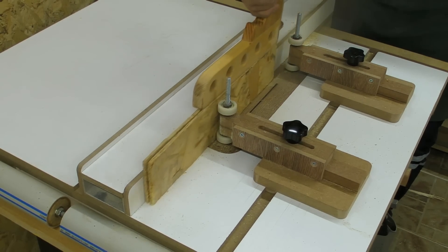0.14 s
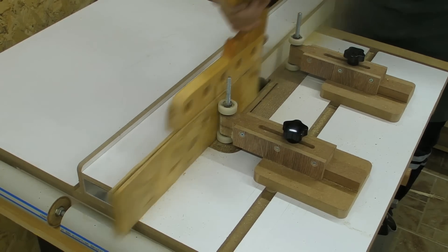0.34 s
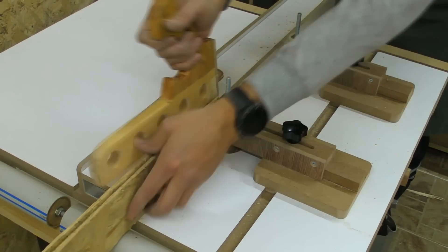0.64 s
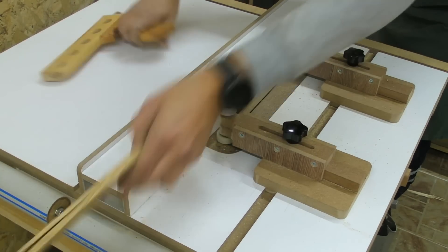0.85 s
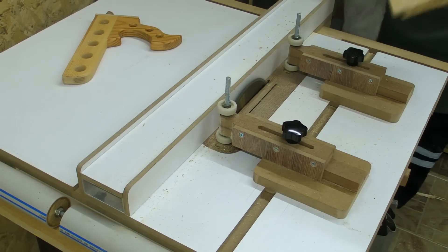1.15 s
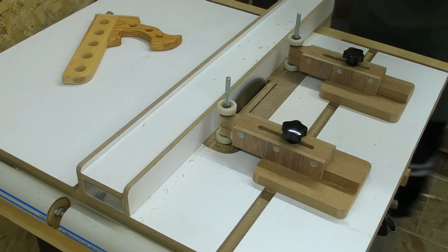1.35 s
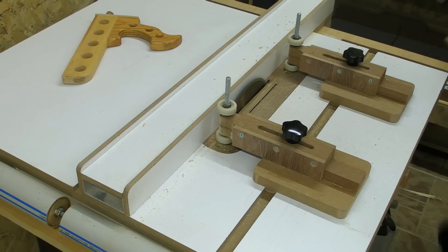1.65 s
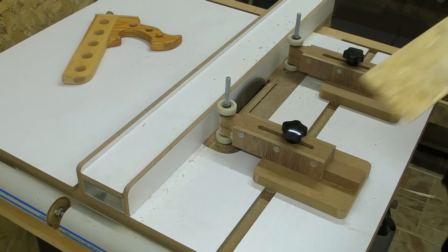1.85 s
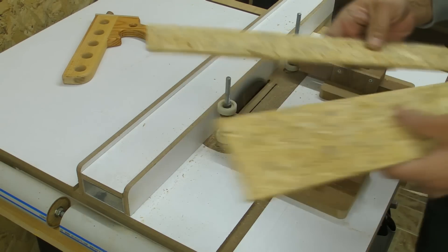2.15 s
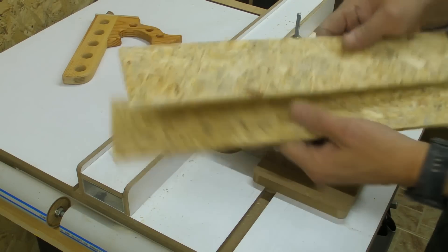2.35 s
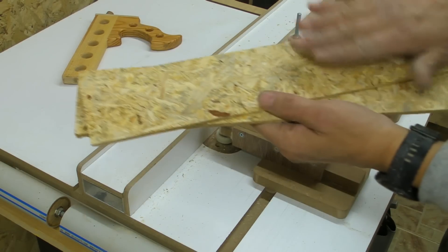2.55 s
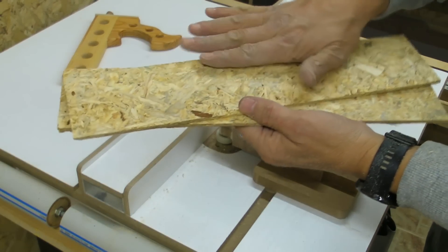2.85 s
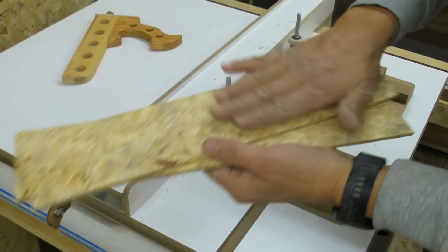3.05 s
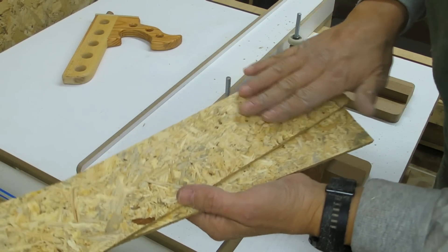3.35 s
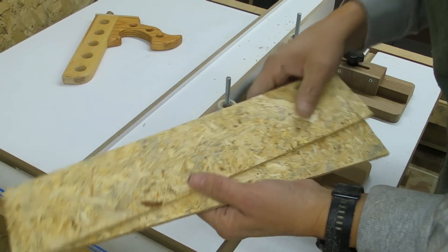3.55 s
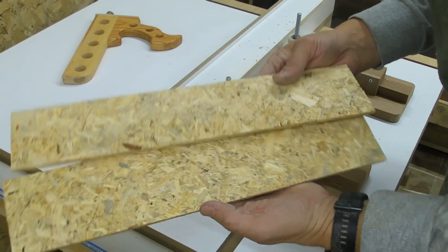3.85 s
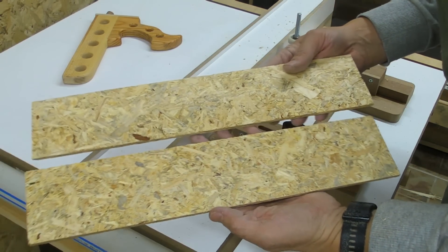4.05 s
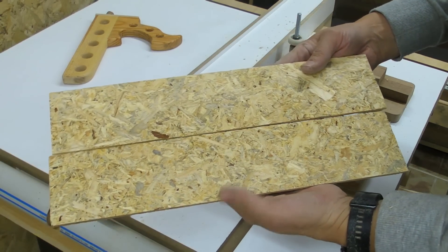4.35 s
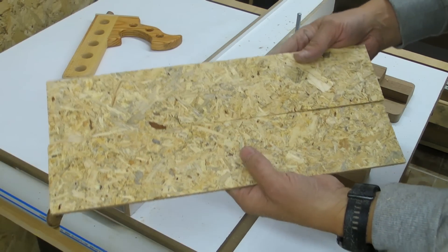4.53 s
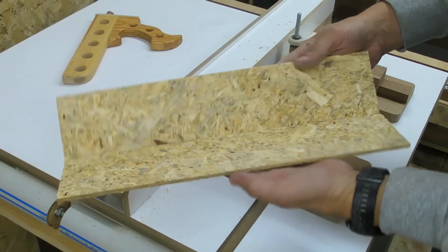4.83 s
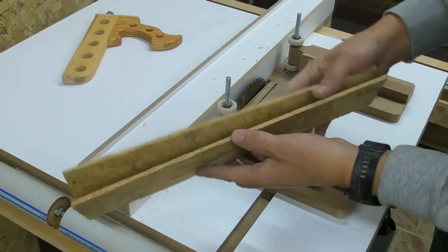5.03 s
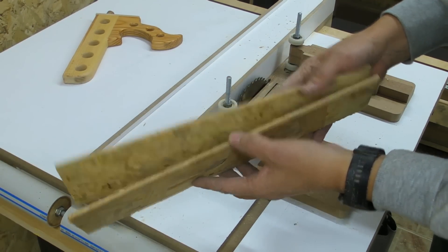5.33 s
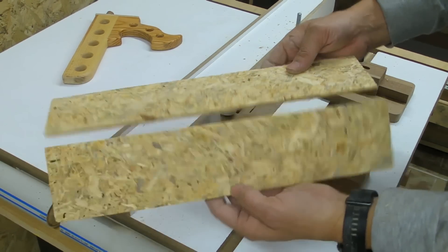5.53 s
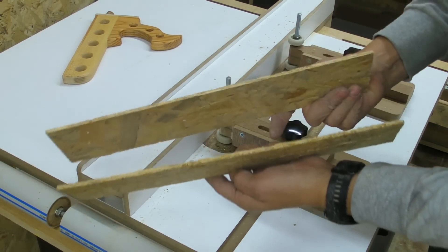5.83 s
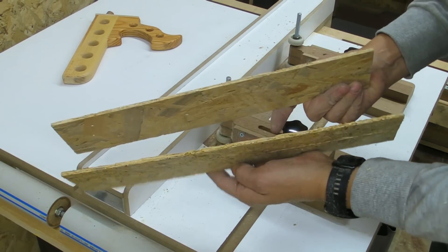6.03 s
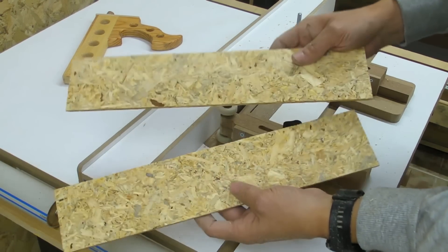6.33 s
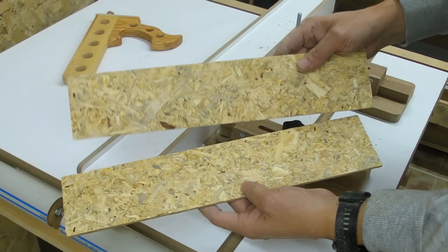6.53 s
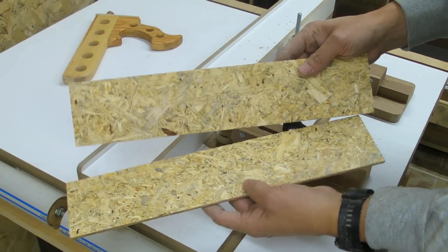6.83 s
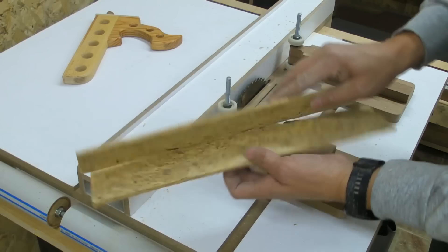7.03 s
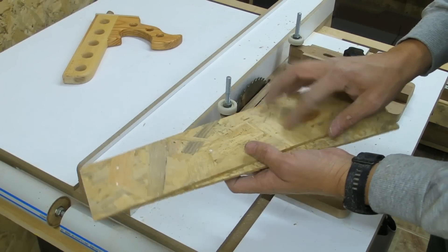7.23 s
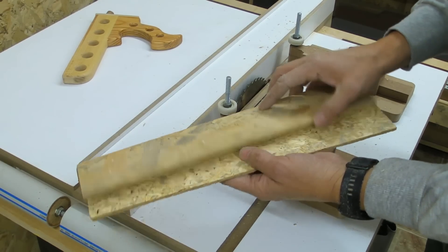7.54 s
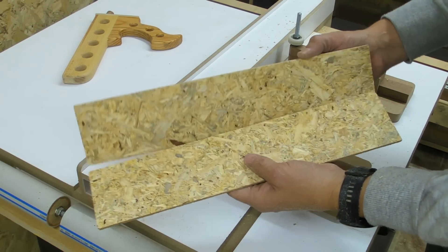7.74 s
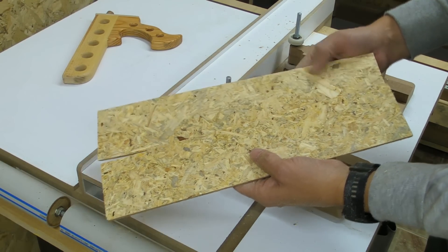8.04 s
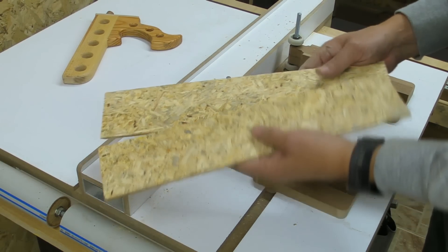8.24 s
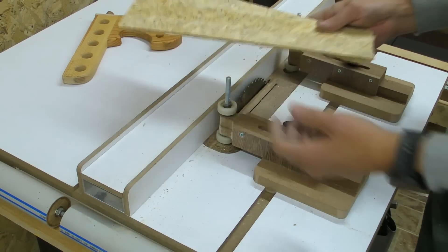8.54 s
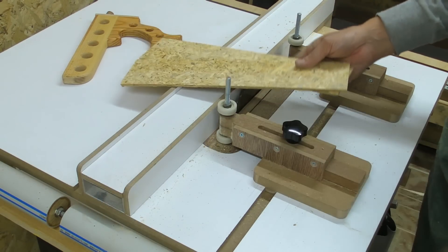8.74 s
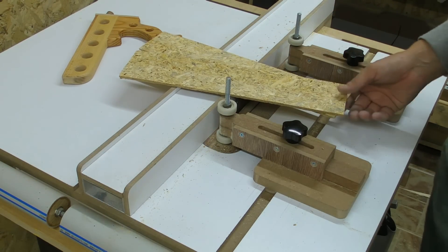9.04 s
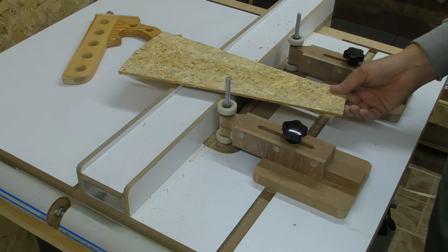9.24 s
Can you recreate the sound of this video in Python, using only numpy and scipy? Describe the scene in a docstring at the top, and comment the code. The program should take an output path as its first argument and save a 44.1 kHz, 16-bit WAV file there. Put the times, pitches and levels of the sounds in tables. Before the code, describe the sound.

A table saw finishes a loud cut, runs free, then whines down to a stop before chipboard strips are rubbed and knocked together.

```python
"""A table saw finishes a cut, runs free, is switched off and coasts to a stop; its motor, blade, fan and gear
tones are locked to one shaft speed, so the whine slides down through the cabinet resonances.
Before it has stopped, two strips of chipboard begin to be rubbed (grainy hiss), then knocked together and
laid down (short bursts that ring the board). A small workshop hums below: steady tones over faint noise."""
import sys
import numpy as np
from scipy import signal
from scipy.fft import rfft, irfft
from scipy.io import wavfile

SR = 44100
rng = np.random.default_rng(int(sys.argv[2]) if len(sys.argv) > 2 else 0)


def put_to_file(sound):
    """Save the sound as 16-bit audio at rate SR, in the file named by the first command-line argument."""
    columns = np.atleast_2d(sound).T  # one column per channel
    safe = np.clip(columns, -1, 1)
    whole_steps = np.round(safe * 32767)
    wavfile.write(sys.argv[1], SR, whole_steps.astype(np.int16))


N = 413658
TIME = np.arange(N) / SR   # s
FREQS = np.maximum(np.arange(N // 2 + 1) * SR / N, 1)   # Hz

# the blade breaks through; the power is cut
CUT_END_S, SWITCH_OFF_S = 0.547, 1.217

# Cabinet and blade resonances. Each row: frequency in Hz, width in Hz, boost in dB.
CABINET_MODES = [(179.7, 26, 12), (249.5, 9.4, 17), (292.5, 10, 11.5), (368, 24, 7.5), (402.4, 24, 13),
                 (481.7, 13.2, 13.5), (639.4, 17, 9.5), (763, 18, 8.5), (925, 33.4, 10),
                 (958.7, 19.5, 15.5), (1092, 19, 10), (1230, 28, 5), (1554, 18, 7.5), (1731, 26, 11.5),
                 (1886, 30, 7.5), (2010, 110, 4), (2808, 190, 8.5), (3380, 87, 6.5), (5550, 170, 5)]
# Chipboard resonances. Each row: frequency in Hz, width in Hz, boost in dB.
BOARD_MODES = [(227, 28, 5.5), (410, 19, 17), (680, 46, 7), (820, 50, 0.5), (942, 130, 9), (1217, 95, 5.5),
               (1527, 200, 4), (1900, 120, 5.5), (3160, 150, 5.5), (3870, 140, 3.5), (5880, 680, 7.5)]
# Spectrum of wood flakes rubbing. Each row: frequency in Hz, relative level in dB.
RUB_SPECTRUM = [(300, -11.5), (600, -4), (1000, -7.5), (1350, 1.5), (2300, -0.5), (3300, -1), (4800, -3),
                (6000, -6.5), (7300, -9), (9500, -5), (12000, -7), (15500, -3.5)]
# Stereo width. Each row: frequency in Hz, side less mid level in dB.
STEREO_WIDTH = [(60, -1), (110, -21.5), (200, -11), (380, -19.5), (700, -13.5), (1290, -13.5), (2380, -10),
                (4400, -6.5), (8120, -3.5), (15000, -1)]


def shaft_speed():
    """Rotation under load: turns per second, wandering with the uneven feed while the blade is in the wood."""
    # Held down by the cut, racing up once free, then coasting. Each row: time in seconds, turns per second.
    speed_curve = [(0, 91), (.36, 93), (.55, 92), (.68, 96.7), (.78, 99.6), (.92, 100.8), (1.2, 101.7),
                   (1.3, 95), (1.4, 84.5), (1.55, 73), (1.75, 63), (2.0, 55), (2.25, 47.6), (2.5, 40.6),
                   (3.0, 29), (3.5, 18.7), (4.0, 9.2), (4.52, 0)]
    in_wood = 1 - after(CUT_END_S, 0.057)
    return np.interp(TIME, *np.transpose(speed_curve)) + 0.3985 * drift(9) * in_wood


def cutting(turns):
    """Chip fracture: tearing teeth make bright noise, and a ragged buzz that dies shortly before breakthrough."""
    # Each row: frequency in Hz, relative level in dB.
    tearing_spectrum = [(50, -21), (150, -11.5), (280, -26), (420, -4.5), (600, -4.5), (900, -10),
                        (1300, -0.5), (2300, -5.5), (3500, 1), (6000, 2.5), (7300, -2.5), (10500, 2),
                        (15500, -2)]
    # Tones under load. Each row: multiple of the shaft speed, relative level in dB.
    load_orders = [(5, -54.5), (10, -53), (15, -48), (30, -40.5), (45, -52.5), (60, -41), (90, -42.5),
                   (105, -38.5), (120, -38), (135, -42.5), (150, -41.5), (165, -45.5)]
    tearing = comb(resonate(noise(tearing_spectrum), CABINET_MODES), depth_db=2.8, spacing_hz=91.1)
    chips = from_db(-35 + drift(400) + 0.5 * drift(6.2)) * tearing
    buzz = from_db(-9.5) * tones(turns, load_orders, flutter_db=3.5, smear=2.2, rate=39.4)
    buzz = buzz * (1 - after(0.36, 0.022))
    return (chips + buzz) * (1 - after(CUT_END_S, 0.032))


def running_free(speed, turns):
    """Rotating machinery without load: broadband air rush, and tones at multiples of the shaft speed."""
    free, powered = after(CUT_END_S, 0.03), 1 - after(SWITCH_OFF_S, 0.011)
    whistle_on = after(0.666, 0.014) * (1 - after(1.225, 0.028))
    # whistle_on gates the thin whistle. Each row: multiple of the shaft speed, level in dB.
    whistle_orders = [(39, -55), (40, -44.5), (41, -61.5), (42, -52), (80, -54), (120, -58), (152, -60)]
    whistle = whistle_on * tones(turns, whistle_orders, flutter_db=2.5, smear=0.36, rate=63)
    return (free * air_rush() + whistle + resonate(free * powered * drone(turns), CABINET_MODES)
            + blade_ring() + unbalance(speed, turns))


def air_rush():
    """Turbulence: rushing air is broadband noise that dies away after the switch-off."""
    # Each row: frequency in Hz, relative level in dB.
    air_spectrum = [(30, -21), (70, -0.5), (140, -5), (250, -8), (380, 7), (550, 1.5), (800, 2),
                    (1300, 2.5), (2200, -3), (4200, -2.5), (6000, -2.5), (7300, -10.5), (9500, -8.5),
                    (15500, -14.5)]
    dying = 1 - after(1.34, 0.11)   # half gone at 1.34 s
    return from_db(-35) * dying * comb(noise(air_spectrum), depth_db=2.1, spacing_hz=70)


def drone(turns):
    """Periodic forces: motor and blade sound at multiples of their own speeds, with brief swells."""
    # Motor tones. Each row: multiple of the shaft speed, relative level in dB.
    motor_orders = [(2, -28), (3, -27.5), (4, -16.5), (8, -36)]
    # Blade tones. Each row: multiple of the blade speed, relative level in dB.
    blade_orders = [(5, -9), (6, -21), (7, -24.5), (9, -16.5), (10, -18), (11, -17.5), (12, -28),
                    (15, -13.5)]
    # Swells. Each row: time of the peak in seconds, half length in seconds, added gain in dB.
    drone_swells = [(0.615, 0.16, -44), (0.97, 0.0087, -39), (1.153, 0.033, -40.5)]
    blade_ratio = 1.014   # blade turns per shaft turn
    gain = from_db(-43.5) + sum(from_db(db) * bump(s, half) for s, half, db in drone_swells)
    motor = tones(turns, motor_orders, flutter_db=2, smear=0.18, rate=12)
    blade = tones(blade_ratio * turns, blade_orders, flutter_db=5.0, smear=0.54, rate=12.94)
    return gain * (motor + blade)


def blade_ring():
    """Modal excitation: the blade sings briefly, grazed by the board's last corner, shaken, scuffed as it stops."""
    # Each row: frequency in Hz, width in Hz, time of the peak and half length in seconds, level in dB.
    blade_modes = [(3120, 17, 0.514, .05, -45), (4000, 15, 0.55, 0.054, -44.5),
                   (5360, 12.6, 0.507, 0.06, -48), (8700, 87, .5, 0.019, -42),
                   (4960, 13.6, .56, 0.028, -36), (4700, 130, 0.584, 0.057, -40),
                   (4360, 38, 0.518, 0.052, -43.5), (5360, 94, 2.45, .1, -44),
                   (5900, 300, 4.455, .025, -69), (12100, 450, 4.455, 0.024, -60)]
    return sum(from_db(db + 1.2 * drift(56.2)) * bump(s, half) * ringing(hz, width)
               for hz, width, s, half, db in blade_modes)


def unbalance(speed, turns):
    """Centrifugal force: an off-centre mass hums once a turn, and fades quickly as the shaft slows."""
    free_speed = 101.3   # turns per s
    db_per_speed = 3     # loss for each turn per s below the free speed
    gain = from_db(-35 - db_per_speed * (free_speed - speed) + drift(13.0))
    return gain * (1 - after(1.32, 0.27)) * np.sqrt(2) * np.sin(2 * np.pi * turns)


def coasting(speed, turns):
    """Forced resonance: the falling whine of the slack drive swells on each cabinet resonance it crosses."""
    throb = from_db(2 * np.sin(2 * np.pi * turns))   # once a turn
    noisy = after(1.248, 0.11) * grind(speed, turns)
    tonal = after(SWITCH_OFF_S, 0.019) * (gear_whine(speed, turns, throb) + fan_tone(speed, turns))
    return rattle_ring(speed, throb) + resonate(noisy + tonal, CABINET_MODES)


def grind(speed, turns):
    """Impact noise: the slack drive rattles, each band fading below its own speed, so it dulls as it slows."""
    # Each row: frequency in Hz, relative level in dB.
    coast_spectrum = [(60, -18.5), (130, -5.5), (260, -15), (420, 2.5), (600, 0.5), (850, -2), (1300, 4.5),
                      (2000, -2), (2300, -6), (3300, -6), (5900, -11.5), (6700, -22.5), (7900, -20.5),
                      (8600, -9.5), (10200, -8), (11300, -22), (12200, -15), (13200, -10), (15500, -19.5)]
    # Rows are rumble, clatter, rattle, sizzle and top hiss.
    # Each row: level in dB, knee in turns per second, loss per halving of speed in dB.
    band_laws = [(-46.5, 17.4, 5.5), (-48, 14.2, 9.5), (-40.5, 36, 8), (-39.5, 81.5, 10.5), (-48, 48, 4.5)]
    low, rest = split(shifting_noise(coast_spectrum, depth_db=4.0, spacing_hz=69.8, rate=9), 2320)
    rumble, clatter = split(low, 1375)
    rattle, rest = split(rest, 7700)
    sizzle, top = split(rest, 10000)
    bands = (rumble, clatter, rattle, sizzle, top)
    total = sum(band * with_speed(speed, *law) * from_db(1.06 * drift(12))
                for band, law in zip(bands, band_laws))
    # a slight swing once a turn, and by chance
    return total * from_db(-0.17 * np.sin(2 * np.pi * turns) + 0.43 * drift(130))


def gear_whine(speed, turns, throb):
    """Gear meshing: teeth bounce while fast, then settle into mesh and whine until the drive stalls."""
    # Tones of the drive gear. Each row: multiple of the shaft speed, relative level in dB.
    gear_orders = [(34, -7), (35, -5), (36, -9), (38, -11), (39, -4), (40, 2), (41, -1.5), (42, -5),
                   (45, -10)]
    # Louder speeds. Each row: turns per second, width in octaves, boost in dB.
    gear_swells = [(52, 0.24, 6), (33.84, 0.56, 8.5), (24.24, 0.021, 9), (21, 0.045, 6.5), (10.2, 0.24, 3)]
    mesh_speed, stall_speed = 49, 9.88   # turns per s
    mesh = tones(turns, gear_orders, flutter_db=3.4, smear=1.3, rate=32)
    bounce = tones(turns, gear_orders, flutter_db=5, smear=1.5, rate=28)
    meshed = 0.5 + 0.5 * np.tanh((mesh_speed - speed) / 2)
    whine = from_db(-57.5) * swelling(speed, gear_swells, stall_speed) * throb * mesh * meshed
    # the bounce is loudest near 67 turns per s, over 0.49 octaves, by 4.3 dB
    chatter = from_db(-61.5) * swelling(speed, [(67, 0.49, 4.3)], mesh_speed) * bounce
    return whine + chatter


def fan_tone(speed, turns):
    """Blade passing: the motor fan sounds at multiples of the shaft speed and dies below its stall speed."""
    # Each row: multiple of the shaft speed, relative level in dB.
    fan_orders = [(2, -14.5), (3, -21), (4, -34), (5, 0), (6, -11)]
    # Louder speeds. Each row: turns per second, width in octaves, boost in dB.
    fan_swells = [(102.7, 0.098, 14.5), (58.3, 0.21, 5), (36, .25, -1)]
    gain = from_db(-55) * swelling(speed, fan_swells, stall=32.3)
    return gain * tones(turns, fan_orders, flutter_db=1.0, smear=0.65, rate=22)


def rattle_ring(speed, throb):
    """Sustained modal excitation: the rattle keeps the steel blade ringing, building up as the drive goes slack."""
    # Each row: frequency in Hz, width in Hz, level in dB, knee in turns per second,
    # loss per halving of speed in dB.
    steel_modes = [(954, 39, -47, 8.9, 4), (2830, 130, -59, 23, 12), (5400, 370, -55, 15, 7.5)]
    modes = sum(with_speed(speed, *law) * ringing(hz, width) for hz, width, *law in steel_modes)
    return after(1.5, 0.47) * throb * modes


def with_speed(speed, db, knee, db_per_halving):
    """Power law with a knee: a gain level above the knee speed, falling steadily below it."""
    return from_db(db - db_per_halving * np.log2(1 + (knee / (speed + 1e-6)) ** 4) / 4)


def swelling(speed, swells, stall):
    """Resonance in speed: the gain of a tone that swells around certain speeds and dies below its stall speed."""
    octave = np.log2(speed + 1e-6)
    boost = sum(db * np.exp(-((octave - np.log2(at)) / width) ** 2) for at, width, db in swells)
    return from_db(boost) * (0.5 + 0.5 * np.tanh((octave - np.log2(stall)) / 0.035))


def rubbing():
    """Stick-slip friction: rough flakes catch on skin and each other, a grainy hiss coloured by the board."""
    # Hands and boards rub. Each row: start and length in seconds, relative hiss level in dB,
    # scrape less hiss in dB before the two are mixed.
    rub_strokes = [(3.30, 0.25, -44, 5), (4.435, 0.022, -54.5, -6), (4.65, .015, -64, -8),
                   (4.73, 0.17, -62.5, -3), (4.905, 0.017, -55.5, 1), (4.985, 0.021, -52, 1),
                   (5.03, 0.027, -57.5, -3), (5.37, 0.31, -52, -3.5), (6.108, 0.011, -47, 0.5),
                   (6.14, 0.077, -60, -6), (6.23, 0.077, -54, -3), (6.288, 0.011, -47.5, 1),
                   (6.365, 0.038, -53, 3), (6.85, 0.086, -60, -3.5), (7.052, 0.015, -53, -3),
                   (7.09, 0.031, -54, -2), (7.18, 0.025, -51.5, -0.5), (7.25, 0.16, -59.5, 1),
                   (7.35, 0.028, -59.5, 4.5), (7.475, 0.044, -55, -9), (7.545, 0.059, -54, -1.5),
                   (7.695, 0.024, -57.5, -3), (7.74, 0.031, -70, -4), (7.875, 0.011, -57.5, -1),
                   (7.99, 0.085, -56, -0.5), (8.11, 0.018, -57.5, 1), (8.195, 0.18, -56.5, -1),
                   (8.496, 0.013, -56, -3), (8.78, 0.14, -59.5, 0.5), (9.195, 0.016, -61.5, -9)]
    # Fingers shift on the boards between strokes. Each row: as for the strokes.
    finger_grips = [(4.5, 0.65, -64.5, -1.5), (6.9, 0.98, -63.5, 0), (8.5, 1, -70, 1)]
    hiss_gain = scrape_gain = 0
    for rows, unsteady in ((rub_strokes, from_db(drift(30))), (finger_grips, from_db(2.5 * drift(17)))):
        for start, length, db, scrape_db in rows:
            gain = from_db(db) * stroke(start, length) * unsteady
            hiss_gain = np.maximum(hiss_gain, gain)
            scrape_gain = np.maximum(scrape_gain, gain * from_db(scrape_db))
    grain = from_db(1.8 * drift(900) + drift(70))
    # the colour shifts as the contact wanders over the board
    surface = shifting_noise(RUB_SPECTRUM, depth_db=3.4, spacing_hz=290, rate=9)
    low, high = split(resonate(surface * grain + snags(), BOARD_MODES), 3130)
    # the fingers' changing grip lets the board's body sound more or less
    scrape = from_db(-8.5) * scrape_gain * low * from_db(0.46 * drift(27))
    return scrape + from_db(-3.0) * hiss_gain * high


def stroke(start, length):
    """Growth and decay: a rub swells, holds and lets go, leaving a short wash in the room."""
    attack = 0.016 + 0.16 * length   # s: a least part plus a share of the length
    rise = after(start + attack / 2, attack / 2)
    since_end = np.clip(TIME - start - length, 0, 1)
    release = np.exp(-since_end / 0.021)   # s to fall to 1/e
    wash = from_db(-5) * np.exp(-since_end / 0.065)
    return rise * np.maximum(release, wash)


def snags():
    """Random impulses: sparse ticks of uneven size, from single flakes that catch and let go."""
    per_second, least_db, spread_db = 90, 11, 1   # sizes before colouring
    born = rng.random(N) < per_second / SR
    size_db = least_db + spread_db * np.minimum(rng.exponential(1, N), 3)
    ticks = born * from_db(size_db) * rng.choice([-1, 1], N)
    return irfft(rfft(ticks) * from_db(at_hz(RUB_SPECTRUM)), N)


def knocks():
    """Impact: each contact is a crack and a short burst that ring the board, with a wash from the room."""
    # Boards knocking; edge taps have little bass. Each row: time in seconds, relative level in dB,
    # lowest frequency in Hz, contact brightness in Hz.
    contacts = [(5.005, -32.5, 450, 1710), (6.12, -45, 1300, 5000), (6.296, -37.5, 1200, 4970),
                (6.385, -42, 1400, 2600), (6.398, -44, 1400, 3000), (7.062, -33, 200, 1300),
                (7.0972, -23, 352, 1700), (7.103, -29, 500, 1700), (7.109, -32, 350, 1500),
                (7.121, -30.5, 400, 2000), (7.13, -38, 500, 1600), (7.226, -36, 150, 500),
                (7.703, -43, 3000, 11970), (7.762, -37, 250, 1200), (8.021, -38, 3000, 12000),
                (8.505, -46, 2000, 7030), (8.704, -33.5, 900, 2600), (8.715, -26, 794, 2600),
                (8.724, -34.5, 400, 1200), (8.747, -33, 350, 900), (8.809, -30, 700, 1500),
                (8.829, -32, 200, 604), (8.948, -29.5, 150, 505)]
    # Each row: frequency in Hz, relative level in dB.
    knock_spectrum = [(120, -4), (220, -4), (450, -7.5), (700, -6.5), (1100, -9.5), (1700, -12),
                      (2500, -17), (5000, -19), (15000, -23.5)]
    bounce_t60_s, wash_t60_s = 0.076, 0.3
    out, t = np.zeros((2, N)), TIME[:SR // 3]
    fade = from_db(-60 * t / bounce_t60_s) + from_db(-10 - 60 * t / wash_t60_s)
    for s, db, low_hz, bright_hz in contacts:
        shared = rng.standard_normal(len(t))
        burst = (shared + 0.22 * rng.standard_normal((2, len(t)))) * fade
        burst[:, 0] -= 10 * from_db(0.5)   # the crack of the first touch
        high_hz = np.clip(bright_hz, 1.2 * low_hz, SR / 3)
        contact = signal.butter(1, [low_hz, high_hz], "band", fs=SR)
        start = round(s * SR)
        knock = from_db(db - 9.0) * signal.lfilter(*contact, burst)
        out[:, start:start + len(t)] += knock[:, :N - start]
    return resonate(irfft(rfft(out) * from_db(at_hz(knock_spectrum)), N), BOARD_MODES)


def workshop():
    """Stationary background: mains hum and a small fan's steady note over faint air noise."""
    # Each row: frequency in Hz, level in dB.
    hum_tones = [(100.4, -65), (470, -66.5), (400, -99)]
    # Each row: frequency in Hz, relative level in dB.
    floor_spectrum = [(25, -26.5), (80, -4), (150, -8.5), (280, -14.5), (350, -5.5), (400, 3), (450, -5.5),
                      (560, -10.5), (900, -15.5), (2000, -23.5), (6000, -26.5), (8000, -29), (15500, -33.5)]
    hum = sum(from_db(db + 0.26 * drift(6.3)) * np.sqrt(2)
              * np.sin(2 * np.pi * hz * TIME + 0.051 * drift(5.1)) for hz, db in hum_tones)
    return hum + from_db(-70.0) * noise(floor_spectrum)


def tones(turns, orders, flutter_db, smear, rate):
    """Order tones: partials locked to the shaft, each wavering in level (dB) and phase (radians)."""
    return sum(from_db(db + flutter_db * drift(rate)) * np.sqrt(2)
               * np.sin(2 * np.pi * k * turns + smear * drift(rate)) for k, db in orders)


def ringing(hz, width):
    """Resonator driven by noise: a mode kept ringing by dense random taps, a little different at each ear."""
    r = np.exp(-np.pi * width / SR)
    poles = [1, -2 * r * np.cos(2 * np.pi * hz / SR), r * r]
    mid, side = signal.lfilter([1, 0, -1], poles, rng.standard_normal((2, N)))
    side = side * from_db(np.interp(hz, *np.transpose(STEREO_WIDTH)))
    return rms_one(np.array([mid + side, mid - side]))


def resonate(x, modes):
    """Resonance: each mode boosts what passes near it, and rings."""
    response = 1
    for hz, width, db in modes:
        detune = 1j * (FREQS ** 2 - hz ** 2) / (FREQS * width)
        response = response * (from_db(db) + detune) / (1 + detune)
    return irfft(rfft(x) * response, N)


def comb(x, depth_db, spacing_hz):
    """Interference: reflections leave fine irregular ripples in the spectrum, deeper toward the treble."""
    ripple = np.interp(FREQS / spacing_hz, np.arange(2048), rng.standard_normal(2048))
    return rms_one(irfft(rfft(x) * from_db(depth_db * ripple * FREQS / (FREQS + 1200)), N))


def shifting_noise(spectrum, depth_db, spacing_hz, rate):
    """Changing interference: noise whose ripples keep changing as it wanders between three patterns."""
    place = 1.6 * drift(rate)
    total = 0
    for k in range(3):
        share = np.maximum(np.cos(place + 2 * np.pi * k / 3), 0)
        total = total + share * comb(noise(spectrum), depth_db, spacing_hz)
    return rms_one(total)


def noise(spectrum):
    """Filtered white noise: stereo noise of a given spectrum and unit power, its width set by frequency."""
    mid, side = rfft(rng.standard_normal((2, N))) * from_db(at_hz(spectrum))
    side = side * from_db(at_hz(STEREO_WIDTH))
    return rms_one(irfft(np.array([mid + side, mid - side]), N))


def split(x, hz):
    """Crossover: the parts below and above a frequency, each of unit power."""
    low = irfft(rfft(x) / (1 + (FREQS / hz) ** 8), N)
    return rms_one(low), rms_one(x - low)


def drift(rate):
    """Random modulation: smooth chance of spread 1 that changes about rate times a second."""
    knots = rng.standard_normal(8192)
    return np.interp(TIME * rate, np.arange(len(knots)), knots) * np.sqrt(3 / 2)


def after(s, width):
    """Smooth onset: a step from 0 to 1 around a time in seconds."""
    return 0.5 + 0.5 * np.tanh((TIME - s) / width)


def bump(s, half):
    """Gaussian envelope: a swell to 1 at a time in seconds."""
    return np.exp(-((TIME - s) / half) ** 2)


def at_hz(points):
    """Logarithmic pitch scale: a spectrum table interpolated on the frequency grid."""
    hz, value = np.transpose(points)
    return np.interp(np.log(FREQS), np.log(hz), value)


def from_db(db):
    """Level to amplitude: decibels to gain."""
    return 10 ** (np.asarray(db) / 20)


def rms_one(x):
    """Power normalization: scale to unit power."""
    return x / np.sqrt(np.mean(x ** 2) + 1e-20)


def scene():
    """Superposition: the saw and the boards sound in the humming room."""
    speed = shaft_speed()
    turns = np.cumsum(speed) / SR
    saw = cutting(turns) + running_free(speed, turns) + coasting(speed, turns)
    return saw + rubbing() + knocks() + workshop()


def record(dry):
    """Linear filtering: the sound eases in, the left is slightly louder, the top is cut steeply."""
    # Each row: frequency in Hz, left less right level in dB.
    left_lean = [(60, 0.5), (110, 2.5), (200, 0.5), (380, 1.5), (700, 1.5), (1290, 1.0), (2380, 0.5),
                 (4400, 1.0), (8120, 2), (15000, 2.5)]
    cutoff_hz = 15760
    ease_in = np.minimum(TIME / 0.008, 1)
    lean = from_db(at_hz(left_lean) * np.array([[0.5], [-0.5]]))
    top = 1 / np.sqrt(1 + (FREQS / cutoff_hz) ** 300)
    return irfft(rfft(dry * ease_in) * lean * top, N)


dry = scene()
out = record(dry)
put_to_file(out)
```